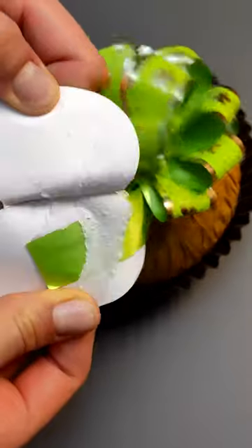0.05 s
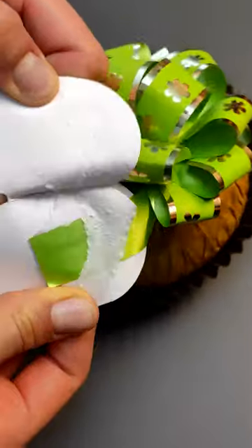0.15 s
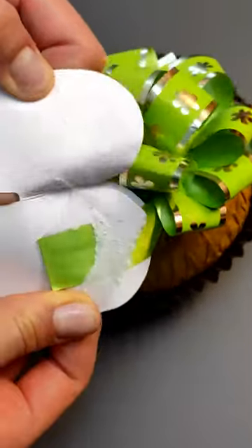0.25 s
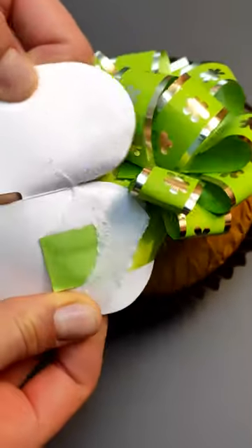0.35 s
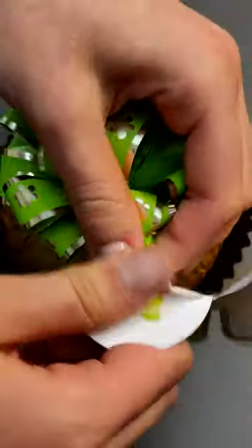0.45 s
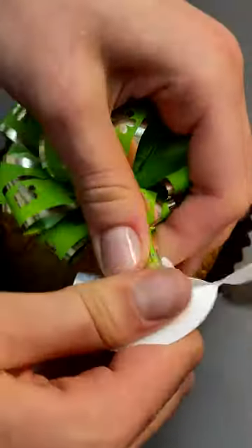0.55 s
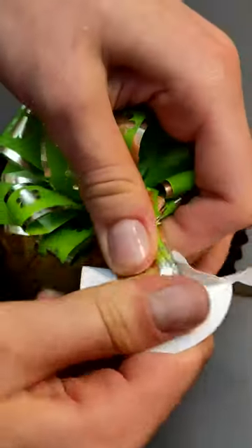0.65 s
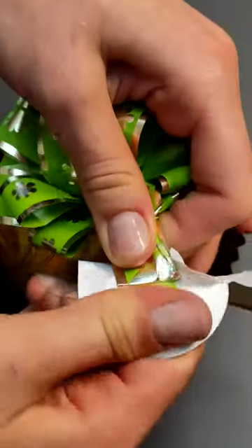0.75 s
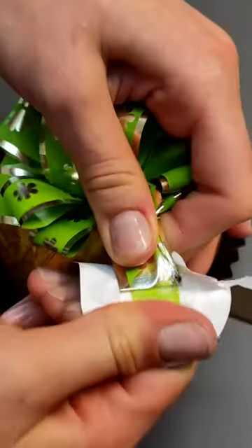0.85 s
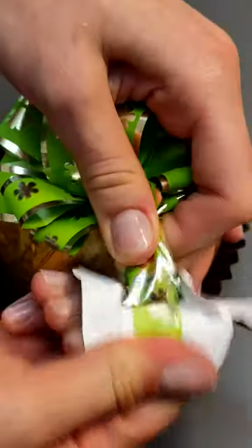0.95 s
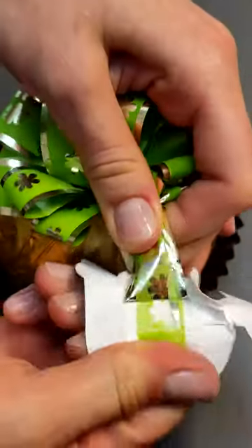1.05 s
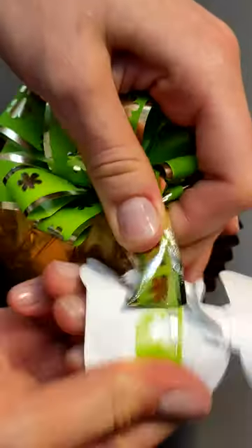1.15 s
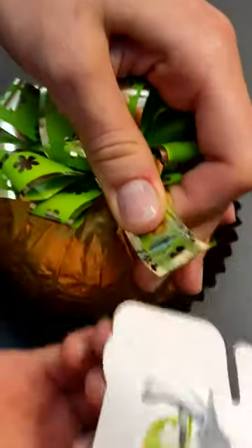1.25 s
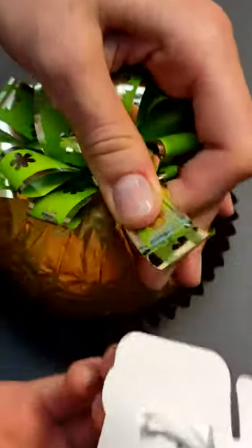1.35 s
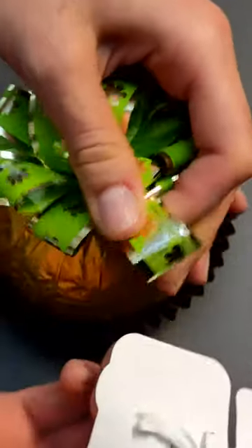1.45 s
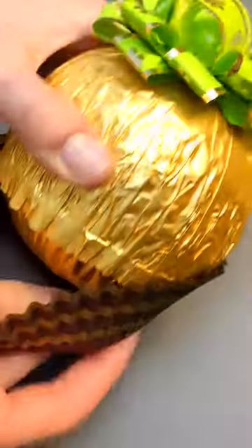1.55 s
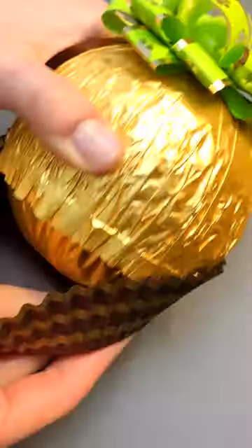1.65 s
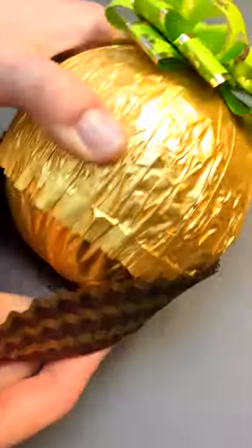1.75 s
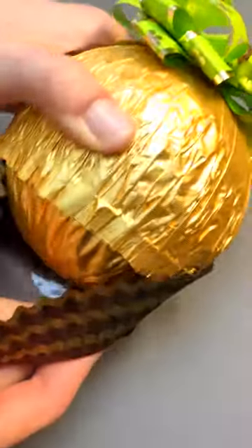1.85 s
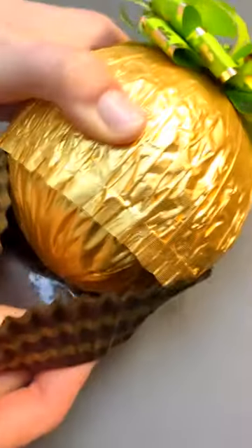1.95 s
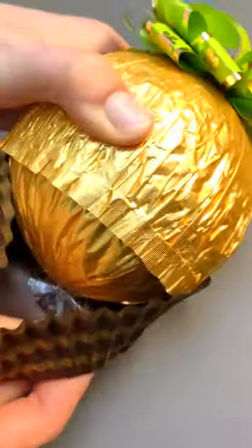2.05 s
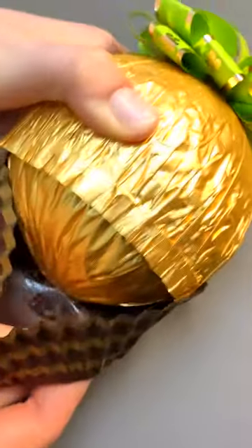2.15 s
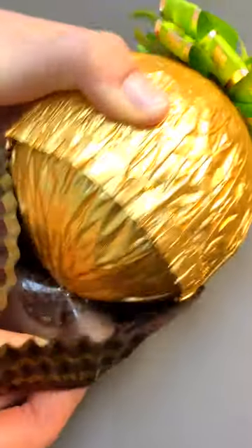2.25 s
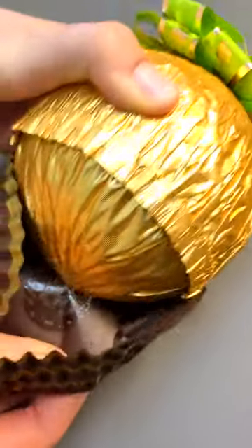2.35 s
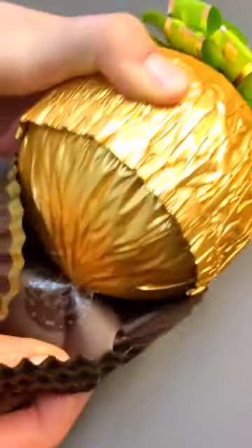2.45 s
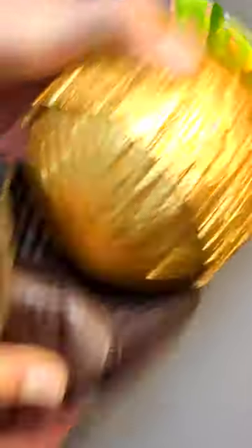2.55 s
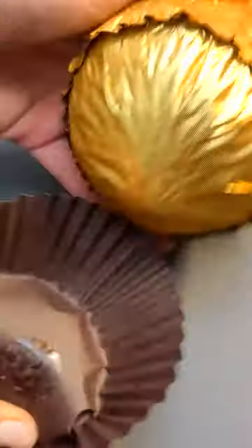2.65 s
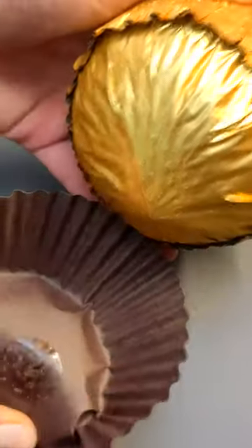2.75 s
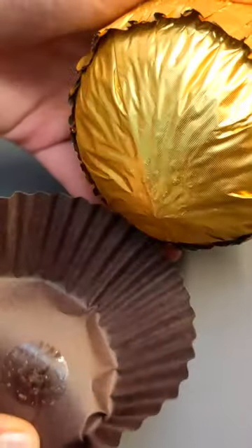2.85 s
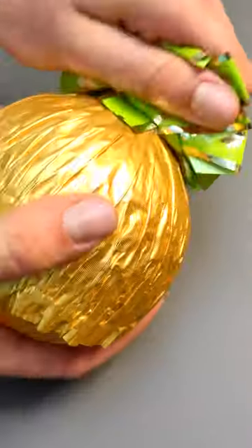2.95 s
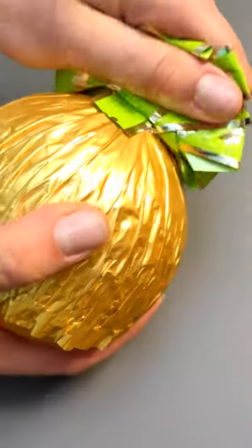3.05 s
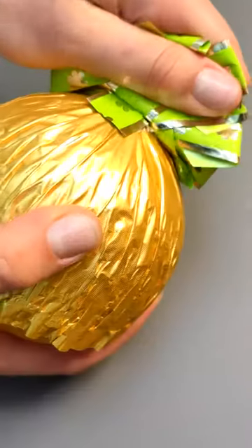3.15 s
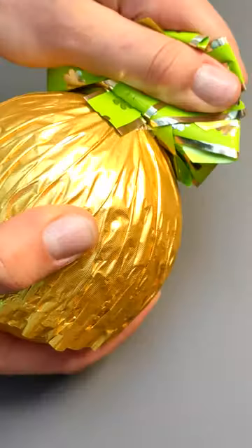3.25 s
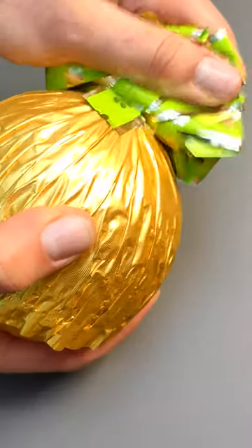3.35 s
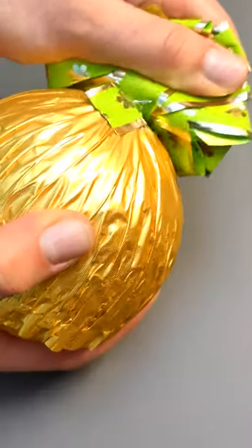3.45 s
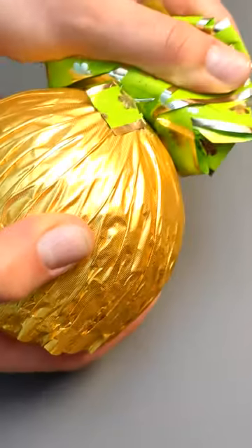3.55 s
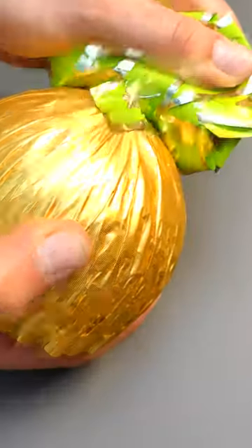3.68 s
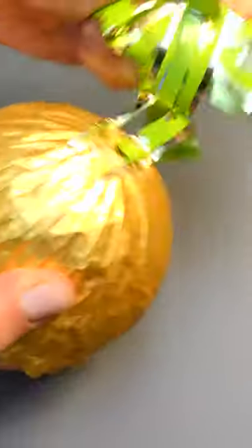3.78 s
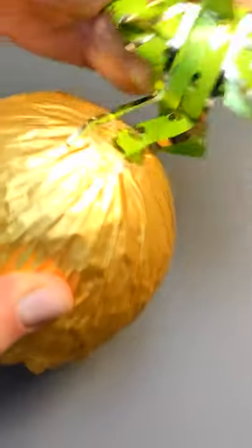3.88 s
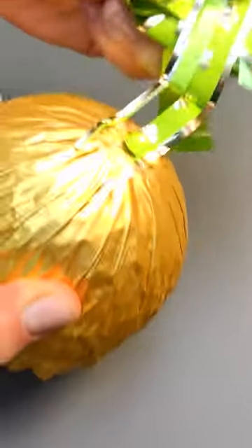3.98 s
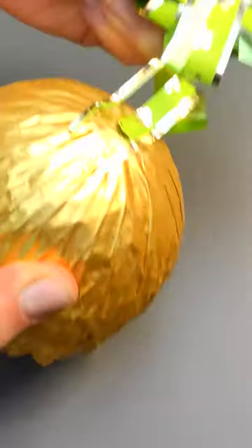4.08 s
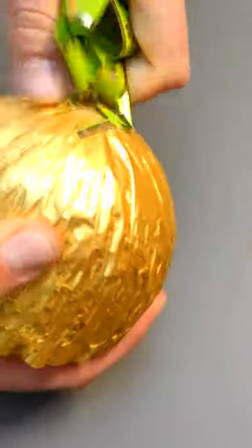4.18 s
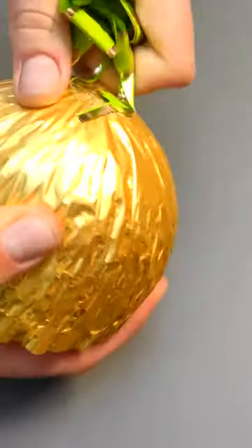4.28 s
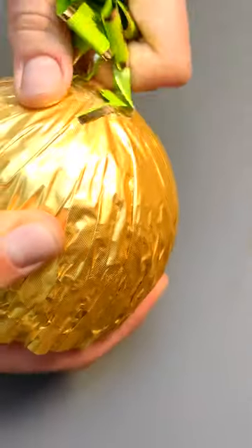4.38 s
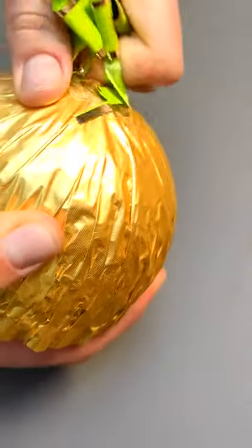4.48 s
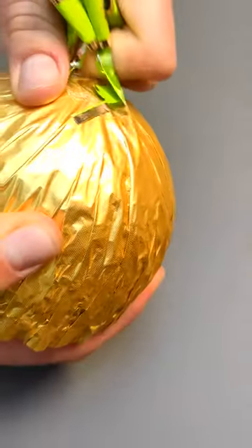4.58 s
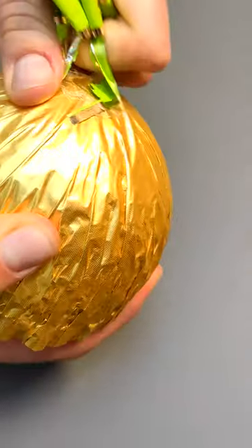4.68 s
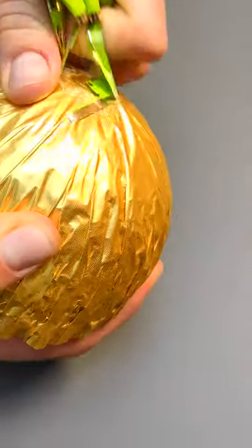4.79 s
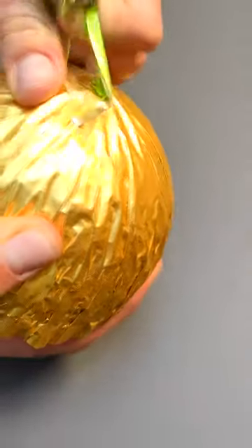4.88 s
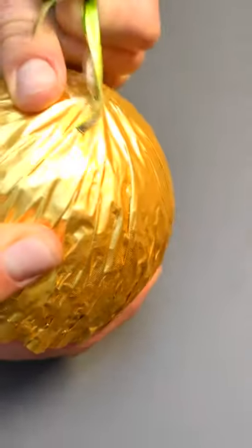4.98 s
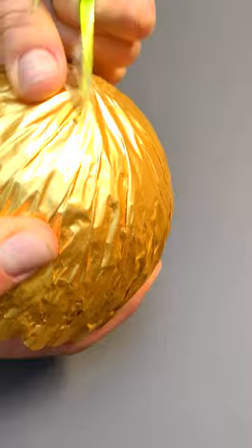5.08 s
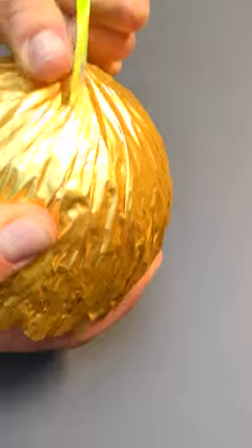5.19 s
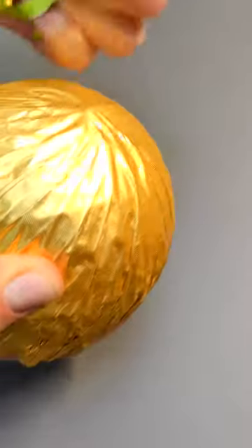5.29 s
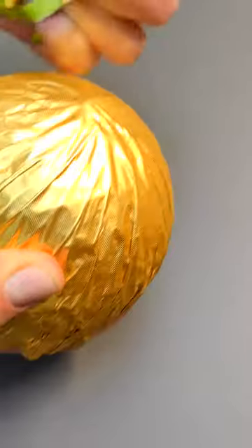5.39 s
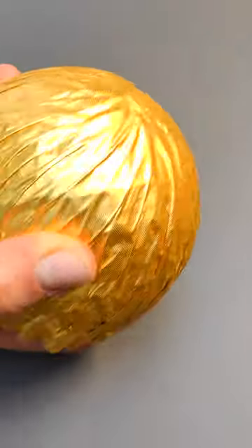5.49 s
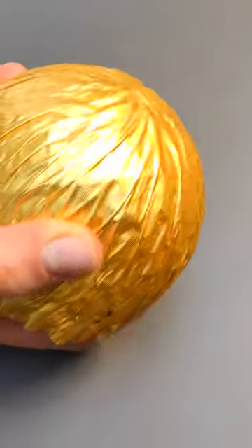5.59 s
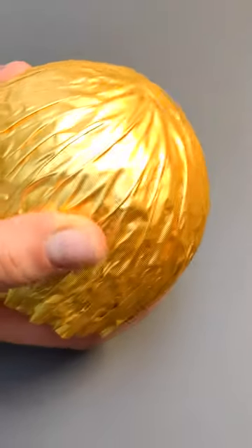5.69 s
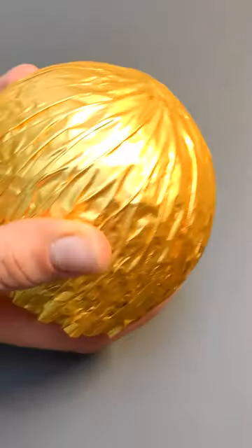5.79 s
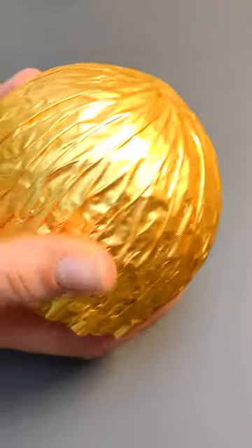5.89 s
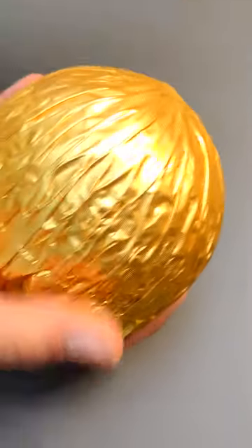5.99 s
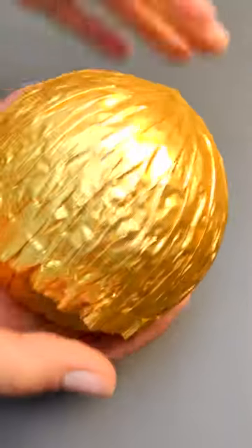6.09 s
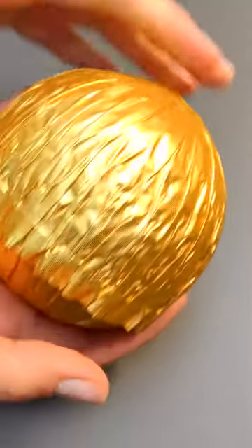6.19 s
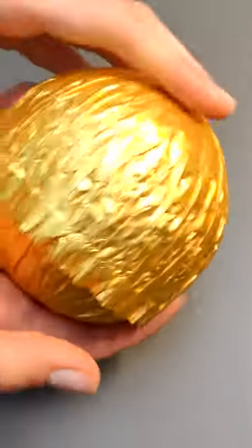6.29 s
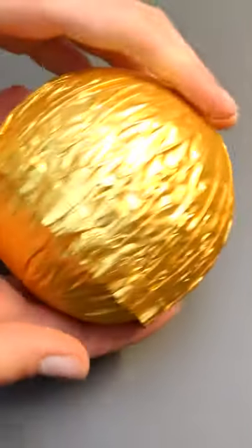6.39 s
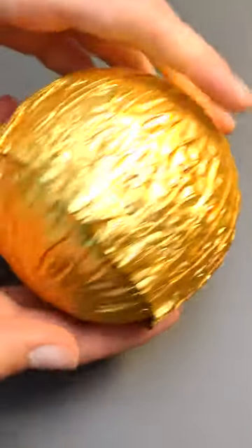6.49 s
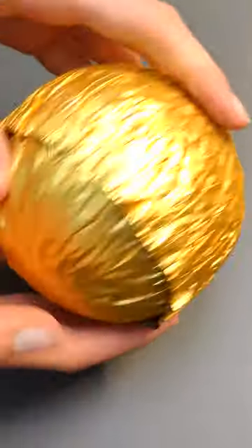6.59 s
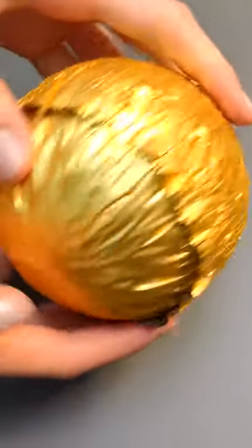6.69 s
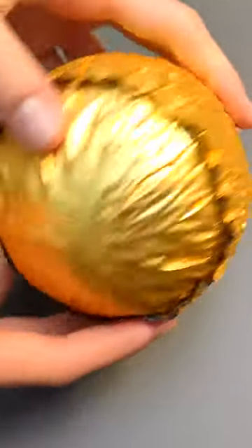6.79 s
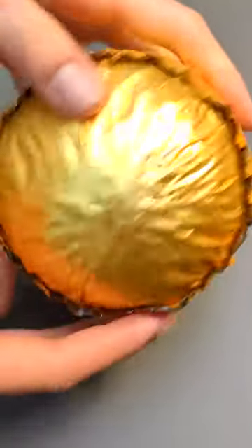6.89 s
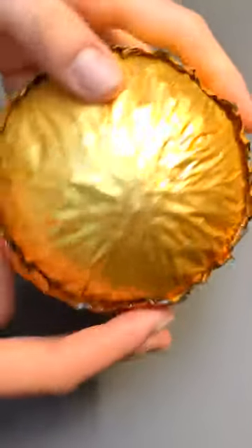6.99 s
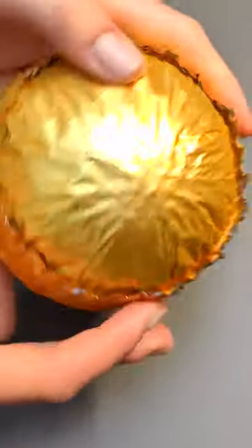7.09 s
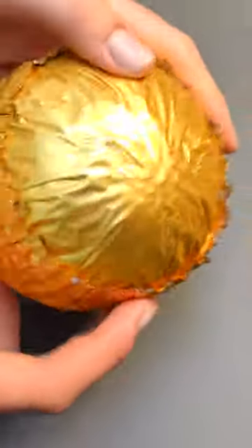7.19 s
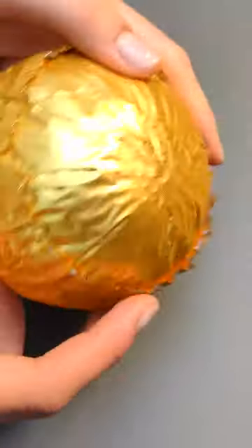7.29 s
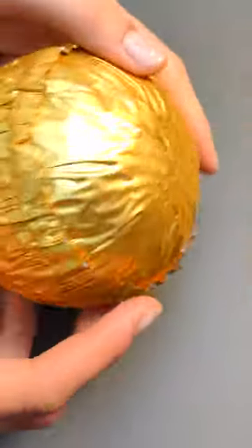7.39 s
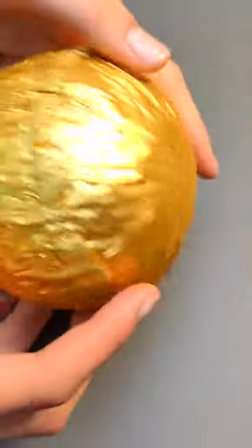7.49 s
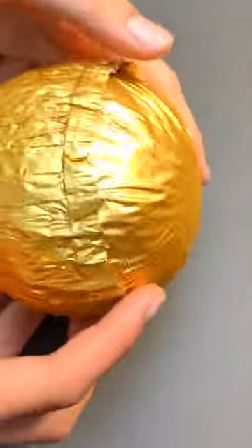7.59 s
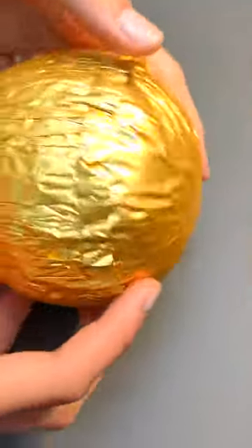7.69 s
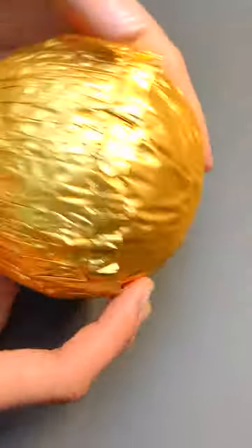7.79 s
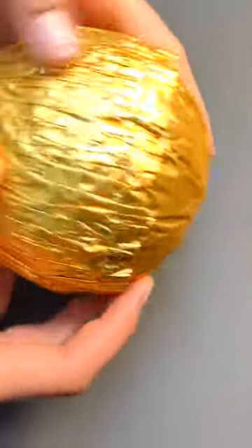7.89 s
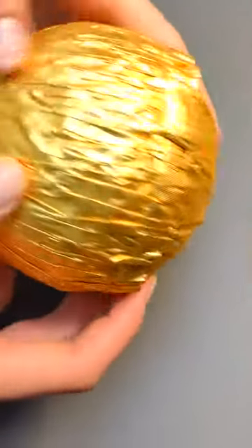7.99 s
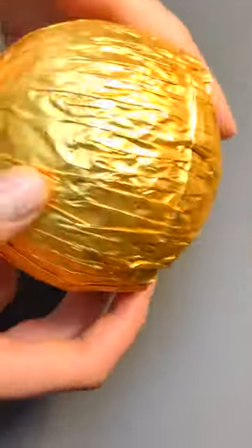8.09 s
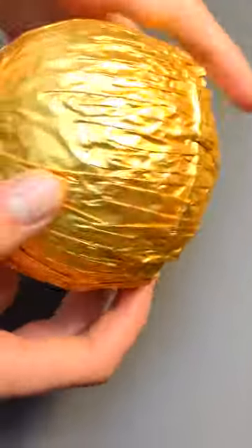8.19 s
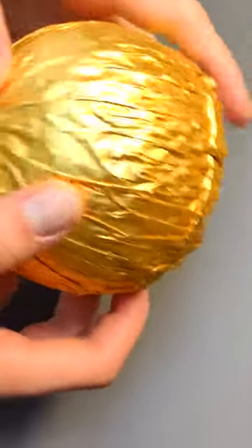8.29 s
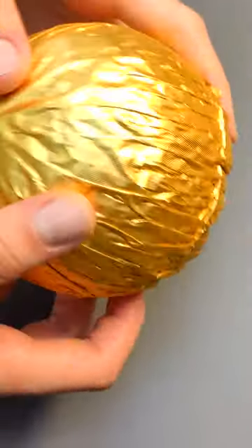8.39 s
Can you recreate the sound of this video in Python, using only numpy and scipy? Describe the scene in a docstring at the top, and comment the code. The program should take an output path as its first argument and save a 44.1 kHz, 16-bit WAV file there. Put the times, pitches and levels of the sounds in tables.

```python
"""Close up in a small room, hands unwrap a large hollow ball in thin foil, over faint air noise and an early hum.
First a paper tag is torn off, then a pleated paper cup is peeled away, a bow is pulled loose, its ribbon follows,
and the ball is turned in the fingers. Grips swell fine crackle (random ticks on ringing facets) and paper rubbing;
creases snap as noisy clicks, glue rips as click avalanches that shake the resonant shell; bumps and low thumps are
short resonant noise bursts. Scattered echoes answer from close by and from the walls."""
import sys
import numpy as np
from scipy import signal
from scipy.fft import rfft, irfft, next_fast_len
from scipy.io import wavfile
from scipy.ndimage import uniform_filter1d, minimum_filter1d

SR = 44100
rng = np.random.default_rng(int(sys.argv[2]) if len(sys.argv) > 2 else 0)


def output_pcm(signal):
    """Save a mono or channel-first signal as 16-bit PCM at the path in sys.argv[1].

    Samples are clipped to [-1, 1] before scaling.
    """
    pcm = np.clip(np.atleast_2d(signal).T, -1, 1) * 32767
    wavfile.write(sys.argv[1], SR, np.round(pcm).astype(np.int16))


N = 372204
TIME = np.arange(N) / SR


def from_db(db):
    """Decibels to amplitude gain."""
    return 10 ** (np.asarray(db) / 20)


def rms_one(x):
    """Scale to unit power."""
    return x / np.sqrt(np.mean(x ** 2) + 1e-20)


def convolve(x, response):
    """Pass a sound through an impulse response, keeping its length."""
    return signal.fftconvolve(x, response)[:len(x)]


def colour(x, spectrum, size=4096):
    """Causal (minimum-phase) filter with the given spectrum."""
    hz, db = np.transpose(spectrum)
    grid_hz = np.maximum(np.arange(size // 2 + 1) * SR / size, 1)
    level_db = np.interp(np.log(grid_hz), np.log(hz), db)
    # folding the cepstrum onto positive time makes the filter minimum-phase
    cepstrum = irfft(np.log(from_db(level_db)))
    cepstrum[1:size // 2] *= 2
    cepstrum[size // 2 + 1:] = 0
    return convolve(x, irfft(np.exp(rfft(cepstrum))))


def resonance(x, hz, width_hz):
    """Two-pole resonance with a gain of about 1 at its peak."""
    radius = np.exp(-np.pi * width_hz / SR)
    zeros = np.array([1, 0, -1]) * (1 - radius ** 2) / 2
    poles = [1, -2 * radius * np.cos(2 * np.pi * hz / SR), radius ** 2]
    return signal.lfilter(zeros, poles, x + 1e-18)


def drift(knots_per_s):
    """Slow random wander with an RMS of 1."""
    knots = rng.standard_normal(int(knots_per_s * N / SR) + 2)
    return rms_one(np.interp(TIME * knots_per_s, np.arange(len(knots)), knots))


def grains(per_s, spread_db, size=N):
    """Random clicks: many small ones, a few large."""
    sizes = from_db(spread_db * np.minimum(rng.exponential(1, size), 3.4))
    signs = rng.choice([-1, 1], size)
    return sizes * signs * (rng.random(size) < per_s / SR)


def add(track, s, sound):
    """Mix a sound into a track at a time in seconds."""
    start = max(int(s * SR), 0)
    track[start:start + len(sound)] += sound[:N - start]


# spectrum of the steady air noise: pitch_hz [Hz], level_db [dB, relative]
AIR_COLOUR = [(30, 2.5), (120, -17), (260, 6.5), (600, 2.5), (1500, -1), (4000, -7.5), (6000, 2),
              (9000, -30), (15500, -11)]


def air(level_db=-60.5):
    """Steady coloured noise lies under everything."""
    return from_db(level_db) * rms_one(colour(rng.standard_normal(N), AIR_COLOUR))


def low_hum(hum_hz=127, width_hz=30, hum_db=-67, swells_per_s=7.3, until_s=1.5):
    """Narrow low noise wavers faintly under the first moments, fading over the last half second."""
    hum = resonance(rng.standard_normal(N), hum_hz, width_hz)
    hum = resonance(hum, hum_hz, width_hz * 2)
    swell = from_db(2 * drift(swells_per_s))
    fade = np.clip((until_s - TIME) * 2, 0, 1)
    return from_db(hum_db) * swell * rms_one(hum) * fade


# The fingers take hold and squeeze: the tag from 0 s, the cup from 1.57 s, the bow from 2.95 s,
# the ribbon from 4.177 s, turning the ball from 5.58 s:
# start_s [s], length_s [s], foil_db [dB, crackle], paper_db [dB, rubbing]
GRIPS_ON_WRAPPING = [(0.0, .15, -35, -42), (0.21, 0.12, -36, -47), (0.38, 0.13, -52, -52),
                     (0.504, 0.1, -44, -49), (0.629, 0.1, -35.5, -43), (0.79, 0.36, -40.5, -48),
                     (1.14, 0.081, -36, -60), (1.411, 0.25, -40, -45.5), (1.57, 0.06, -35, -29),
                     (1.701, .13, -35, -32), (1.83, 0.19, -32.5, -30.5), (2.044, 0.44, -37.5, -34.5),
                     (2.315, 0.29, -35.5, -33), (2.666, 0.035, -17, -19.5), (2.95, 0.04, -23, -33),
                     (3.071, 0.31, -32, -47.5), (3.46, 0.099, -33.5, -44.5), (3.62, 0.13, -41.5, -56.5),
                     (3.93, 0.38, -50, -51.5), (4.177, 0.28, -29, -39), (4.454, 0.45, -35, -46),
                     (5.123, 0.11, -33, -47.5), (5.4, 0.087, -39.5, -49), (5.504, 0.03, -37, -49),
                     (5.58, 0.35, -52.5, -67), (6.124, 0.54, -51.5, -62.5), (6.539, .14, -43.5, -48),
                     (6.706, 0.11, -46, -60), (6.86, 0.13, -45.5, -56.5), (7.092, 0.47, -46, -58),
                     (7.187, 0.11, -42, -54.5), (7.569, 0.094, -32, -46), (7.698, 0.1, -41, -53.5),
                     (7.858, 0.29, -50, -62), (7.996, 0.087, -38.5, -54.5), (8.156, 0.037, -35.5, -53),
                     (8.29, 0.1, -50, -73)]
# a grip closes quickly, eases off while it lasts and lets go
GRIP_ATTACK_S, GRIP_SAG_DB_PER_S, GRIP_RELEASE_DB_PER_S = 0.013, 6.5, 206
# crackle and rubbing build towards each rip and settle after it; the longer the rip, the more it stirs
STRAIN_DB_PER_S, SETTLE_DB_PER_S = 435, 199
STIR_FOIL_DB, STIR_PAPER_DB, STIR_LENGTH_S = -14, -10.5, 0.025


def effort():
    """Hand force as gains of foil crackle and paper rubbing: the grips, plus the strain around every rip."""
    power = np.zeros((2, N))
    for start_s, length_s, foil_db, paper_db in GRIPS_ON_WRAPPING:
        t = TIME - start_s
        sag_db = -GRIP_SAG_DB_PER_S * np.clip(t, 0, length_s)
        release_db = -GRIP_RELEASE_DB_PER_S * np.clip(t - length_s, 0, 1)
        grip = np.clip(t / GRIP_ATTACK_S, 0, 1) * from_db(sag_db + release_db)
        power += np.outer(from_db([foil_db, paper_db]), grip) ** 2
    for start_s, length_s, crack_db, shell_db in GLUE_RIPS:
        build_db = -STRAIN_DB_PER_S * np.clip(start_s - TIME, 0, 1)
        settle_db = -SETTLE_DB_PER_S * np.clip(TIME - start_s - length_s, 0, 1)
        stir = from_db([crack_db + STIR_FOIL_DB, shell_db + STIR_PAPER_DB])
        power += length_s / STIR_LENGTH_S * np.outer(stir, from_db(build_db + settle_db)) ** 2
    return np.sqrt(power)


# bright spectrum of thin foil: pitch_hz [Hz], level_db [dB, relative]
FOIL_COLOUR = [(60, -30.5), (400, -20), (1300, -20), (2600, -6.5), (4300, -0.5), (5800, 4.5), (7200, 1),
               (8700, -8), (11500, -8), (15500, -17.5)]
# spectrum of skin sliding on foil: pitch_hz [Hz], level_db [dB, relative]
HISS_COLOUR = [(60, -21), (400, -23), (1500, -18.5), (3000, -5), (4500, -0.5), (6000, 8), (8700, -4.5),
               (11500, -8), (15500, -11.5)]
# how much the fingers slide rather than press: time_s [s], level_db [dB, hiss against ticks]
FINGER_SLIDING = [(0.0, 0), (2.9, -4), (3.0, -8), (5.4, -2), (7.9, -4.5), (8.1, 13)]


def crackle(per_s=260, spread_db=5.0, facet_width_hz=1500, broad=0.3, even_s=0.025, count=12):
    """Small wrinkles tick, each on a facet of its own pitch, over the fine hiss of skin sliding on foil."""
    clicks = grains(per_s * from_db(4.6 * drift(30)), spread_db)
    facet = rng.integers(0, count, N)
    rings = np.zeros(N)
    for k, hz in enumerate(np.geomspace(2400, 10000, count)):
        rings += resonance(clicks * (facet == k), hz, facet_width_hz)
    ticks = colour(rings + broad * clicks, FOIL_COLOUR)
    # a steady push releases about the same energy in every short stretch
    local_power = np.abs(uniform_filter1d(ticks ** 2, int(even_s * SR)))
    ticks /= np.sqrt(local_power + 0.023 * np.mean(ticks ** 2))
    hiss = rms_one(colour(grains(6000, 1.5), HISS_COLOUR))
    sliding = from_db(np.interp(TIME, *np.transpose(FINGER_SLIDING)))
    return (ticks + sliding * hiss) / np.hypot(1, sliding)


# modes of the hollow ball: pitch_hz [Hz], width_hz [Hz], level_db [dB against the sound that shakes it]
SHELL_MODES = [(280, 45, -6), (470, 42, -6), (639, 34, -7), (1200, 46, -4.5), (1640, 180, -25)]


def shell(x, tuning=1):
    """The hollow ball rings along with what shakes it."""
    ringing = sum(from_db(db) * resonance(x, hz * tuning, width_hz) for hz, width_hz, db in SHELL_MODES)
    return x + ringing


# spectrum of paper and fingers scraping: pitch_hz [Hz], level_db [dB, relative]
PAPER_COLOUR = [(30, -33), (170, -22.5), (290, -13), (420, -9), (650, -4), (900, -2.5), (1250, -1),
                (2100, 0.5), (3200, -2), (6000, -33.5)]


def rubbing(per_s=3000, spread_db=4.5, uneven_db=2.06, wander=0.045):
    """Paper and fingers scrape over the ridges of the ball; its pitch wanders as the hold shifts."""
    slips = grains(per_s, spread_db) * from_db(uneven_db * drift(70))
    scrape = shell(colour(slips, PAPER_COLOUR))
    # reading at a varying speed bends the pitch
    position = np.cumsum(1 + wander * drift(10)) % N
    return rms_one(np.interp(position, np.arange(N), scrape))


# tag, ribbon and foil ring while pulled taut:
# start_s [s], end_s [s], pitch_hz [Hz], width_hz [Hz], level_db [dB against the handling sound]
TAUT_SHEETS = [(0.0, 1.07, 13000, 4930, -2), (0.03, 1.532, 2850, 480, 3), (2.95, 3.426, 10900, 3960, -2.5),
               (4.16, 4.363, 2030, 696, 5.5), (5.603, 5.742, 3070, 453, 6)]


def taut(x):
    """A stretched sheet picks up the handling sounds and rings with them."""
    ringing = np.zeros(N)
    for start_s, end_s, pitch_hz, width_hz, level_db in TAUT_SHEETS:
        pulled = x * ((TIME > start_s) & (TIME < end_s))
        ringing += from_db(level_db) * resonance(pulled, pitch_hz, width_hz)
    return ringing


# single creases snapping: start_s [s], crack_db [dB, before trim], body_db [dB, dull tug before trim]
CREASE_SNAPS = [(0.0845, -4, -22), (0.2872, -5.5, -38), (0.3029, -7, -27), (0.3173, -13, -42),
                (0.3445, -17.5, -33), (0.411, -9.5, -27), (0.507, -17, -34), (0.5249, -15, -33),
                (0.673, -12.5, -31), (0.9409, -7.5, -35), (0.9829, -6.5, -46), (1.067, 1.5, -35),
                (1.1357, -0.5, -33), (1.1554, 2, -51), (1.2157, 2, -21), (1.2577, 0.5, -28),
                (1.5022, -6.5, -36), (1.5654, -10, -25.5), (1.5976, -1.5, -22), (1.843, 0.5, -10.5),
                (1.8656, -6.5, -36), (1.8805, -2, -40), (1.92, 0, -36), (1.955, -5.5, -32.5),
                (1.9783, -2.5, -41), (2.0732, 6, -25), (2.0897, 3.5, -22), (2.107, -13, -31),
                (2.161, -8.5, -23.5), (2.2182, 2.5, -25), (2.2827, -8.5, -37), (2.3026, -6.5, -32),
                (2.3124, 2, -28), (2.385, -13, -16), (2.402, -7.5, -25), (2.5353, 1, -25.5),
                (2.5474, -3, -31), (2.7945, 3, -15), (2.8686, -16, -27.5), (2.9597, -7, -28),
                (2.9813, 0, -33), (3.005, -3, -39), (3.0136, -10.5, -46), (3.0996, -4, -20),
                (3.1365, 0, -27), (3.1714, -6.5, -35), (3.1911, -9, -47), (3.2169, -7.5, -40),
                (3.261, -8, -34), (3.2823, -4, -35), (3.287, -1, -31), (3.3281, -4, -45),
                (3.3757, -14, -48), (3.3952, -8, -48), (3.4406, -16, -52), (3.475, -9, -34),
                (3.5535, -16, -44), (3.619, -15, -54), (3.6391, -9, -33), (3.7767, -2, -23),
                (3.9521, -23, -40), (4.0612, -5, -47), (4.2374, -4, -28), (4.255, -16, -25),
                (4.2597, -11.5, -36), (4.2727, 2, -22.5), (4.3144, -4.5, -28), (4.4633, -11, -27.5),
                (4.5017, -1.5, -37), (4.572, 2, -21.5), (4.6102, 2, -22), (4.6628, -11, -31),
                (4.6934, -8, -38), (4.7, -4, -32), (4.719, -11, -30), (4.7557, 0.5, -21.5),
                (4.8063, -8.5, -38), (4.8258, -15, -49), (4.856, -17, -27), (4.8738, -11.5, -41),
                (4.903, -4.5, -43), (4.92, -8.5, -46), (4.9328, -2.5, -29.5), (4.971, 2.5, -23),
                (5.0381, -8, -24.5), (5.0828, -13, -38), (5.139, -10, -34), (5.1669, -10.5, -40),
                (5.1876, -7.5, -56), (5.259, -6.5, -28.5), (5.432, -18.5, -32), (5.7488, -13, -61.5),
                (5.7803, -29, -43.5), (5.8542, -21.5, -46), (5.9284, -27.5, -64), (5.9582, -26, -59),
                (6.116, -27.5, -50), (6.136, -24, -44), (6.1744, -27.5, -60), (6.2093, -25, -65),
                (6.2341, -20, -48), (6.552, -12, -50), (6.5758, -15, -40), (6.726, -24, -52),
                (6.7744, -11.5, -33), (6.8369, -25, -53), (7.015, -20.5, -40), (7.0813, -22, -49),
                (7.129, -26, -47), (7.2017, -11, -34), (7.2202, -19, -46), (7.2384, -15, -35),
                (7.3362, -17, -49), (7.4038, -25.5, -42), (7.713, -11.5, -47), (7.9014, -21, -52),
                (8.0202, -5.5, -37), (8.3325, -28, -60)]
# dull spectrum of a tug at the shell: pitch_hz [Hz], level_db [dB, relative]
BODY_COLOUR = [(30, -49.5), (170, -19.5), (290, -4), (600, 1), (900, 0), (1900, 4), (3000, 6), (6000, -38)]
CLICK_DELAY_S = .001   # each click sounds this long after its listed time


def snaps(facet_hz=4400, octaves_per_db=0.07, facet_width_hz=1200, overtone=1.31,
          buckle_s=0.00088, buckle_spread=0.62, rough=0.55, after_s=0.006, after_db=-9,
          body_s=0.0011, crack_trim_db=-11.5, body_trim_db=-1.0, size=2048, count=160):
    """A crease flips with a sharp click, a short stutter and a weaker second click, and tugs at the shell.
    Its facet rings in two modes: the smaller the facet, the lighter the tug and the higher the pitch."""
    out, t = np.zeros(N), TIME[:size]
    click = t == 0
    for start_s, crack_db, body_db in CREASE_SNAPS:
        stutter, tug = rng.standard_normal((2, size))
        slowness, lateness, shape, hold = rng.uniform(-1, 1, 4)
        decay_s = buckle_s * np.exp(buckle_spread * slowness)
        flip = click + rough * stutter * np.exp(-t / decay_s)
        second_delay_s = after_s * (1 + lateness / 2)
        flip += from_db(after_db) * np.roll(flip, int(second_delay_s * SR))
        hz = facet_hz * 2 ** (octaves_per_db * (crack_db - body_db) + shape / 10)
        facet = resonance(flip, hz, facet_width_hz)
        facet += .5 * resonance(flip, overtone * hz, facet_width_hz)
        bright = colour(flip + facet, FOIL_COLOUR)
        pull = click + rough * tug * np.exp(-t / body_s)
        dull = shell(colour(pull, BODY_COLOUR), 1 + hold / 20)
        # levels hold for the first few milliseconds
        add(out, start_s + CLICK_DELAY_S, from_db(crack_db + crack_trim_db) * bright / np.std(bright[:count]))
        add(out, start_s + CLICK_DELAY_S, from_db(body_db + body_trim_db) * dull / np.std(dull[:count]))
    return out


# rips, where many creases or glue threads give way at once:
# start_s [s], length_s [s], crack_db [dB, before trim], shell_db [dB, before trim]
GLUE_RIPS = [(0.086, 0.025, -20, -32), (1.001, 0.058, -14.5, -47), (1.028, 0.0058, -8, -28),
             (1.238, 0.0077, -7, -25.5), (1.247, 0.027, -19.5, -27), (2.348, 0.0067, -11.5, -17),
             (2.651, 0.013, -5, -12.5), (2.7, .011, -12.5, -12), (3.464, 0.0046, -4.5, -22),
             (3.801, 0.025, -2, -15.5), (4.3613, 0.0046, -5, -22), (4.405, 0.003, -9, -23),
             (4.984, .011, -8, -23), (5.301, 0.0052, -13.5, -33.5), (5.318, 0.014, -3.5, -17),
             (8.264, 0.0044, -20.5, -66)]


def rips(per_s=7000, spread_db=2.5, release_s=0.0051, crack_trim_db=-2.5, shell_trim_db=-2.0, size=8192):
    """An avalanche of tiny breaks starts at once, runs its length and dies."""
    out, t = np.zeros(N), TIME[:size]
    for start_s, length_s, crack_db, shell_db in GLUE_RIPS:
        strain = np.exp(-np.maximum(t - length_s, 0) / release_s)
        held = max(int(length_s * SR), 20)
        bright = colour(strain * grains(per_s, spread_db, size), FOIL_COLOUR)
        dull = shell(colour(strain * grains(per_s, spread_db, size), BODY_COLOUR))
        add(out, start_s, from_db(crack_db + crack_trim_db) * bright / np.std(bright[:held]))
        add(out, start_s, from_db(shell_db + shell_trim_db) * dull / np.std(dull[:held]))
    return out


# bumps on the hollow ball, and low thumps under the two loudest rips (90 Hz at 3.812 s, 70 Hz at 5.326 s):
# start_s [s], level_db [dB peak, before trim], pitch_hz [Hz]
BUMPS_AND_THUMPS = [(0.428, -34, 470), (0.709, -32, 570), (2.196, -36, 195), (3.812, -23, 90),
                    (5.17, -36.5, 616), (5.324, -19, 275), (5.326, -29, 70), (6.727, -38.5, 674),
                    (7.589, -35, 398), (8.217, -40, 530)]


def bumps_and_thumps(swell_s=0.00502, width_hz=230, skirt_hz=380, trim_db=-2.5, size=6000):
    """A soft, scuffing burst of noise passes two broad resonances at one low pitch and dies quickly."""
    out, t = np.zeros(N), TIME[:size]
    for start_s, level_db, pitch_hz in BUMPS_AND_THUMPS:
        scuff = rng.standard_normal(size) * t * np.exp(-t / swell_s)
        ring = resonance(scuff, pitch_hz, width_hz)
        ring = resonance(ring, pitch_hz, skirt_hz)
        add(out, start_s - swell_s, from_db(level_db + trim_db) * ring / np.abs(ring).max())
    return out


def room(x, near_t60_s=0.032, near_db=-9.0, far_t60_s=0.21, far_db=-14.0, build_s=0.0066, size=22050):
    """Scatter from nearby things dies quickly, the walls answer a little longer."""
    t = TIME[:size]
    near, far = rng.standard_normal((2, size))
    near = rms_one(near * from_db(-60 * t / near_t60_s) * (t > .0012))
    far = rms_one(far * from_db(-60 * t / far_t60_s) * (1 - np.exp(-t / build_s)))
    response = from_db(near_db) * near + from_db(far_db) * far
    return convolve(x, response / np.sqrt(size))


def moving_room(x, knots_per_s=7, swing_rad=1.48):
    """The hands keep moving, so the pattern of scatter keeps changing."""
    angle = swing_rad * drift(knots_per_s)
    return np.cos(angle) * room(x) + np.sin(angle) * room(x)


def delayed(x, s):
    """Delay by any fraction of a sample, as a phase slope."""
    size = next_fast_len(N + SR // 10)
    hz = np.arange(size // 2 + 1) * SR / size
    return irfft(rfft(x, size) * np.exp(-2j * np.pi * hz * s), size)[:N]


# echoes from hands and table top: delay_s [s], level_db [dB against the direct sound]
NEAR_ECHOES = [(.0043, -22.5), (.0052, -33.5)]


def echoes(x):
    """Hands and table top return single weak copies."""
    return sum(from_db(level_db) * delayed(x, delay_s) for delay_s, level_db in NEAR_ECHOES)


def ports(mid, scattered, lag_s=1.0e-5, side_hz=3300, scattered_db=-7.0, wander=1.0):
    """Two close microphone ports differ mainly in the treble: a tiny lag, wandering in strength, and scatter."""
    side = (mid - delayed(mid, lag_s)) / 2 * (1 + wander * drift(40))
    side += from_db(scattered_db) * np.gradient(scattered)
    highpass = signal.butter(2, min(side_hz, SR / 3), "high", fs=SR, output="sos")
    side = signal.sosfiltfilt(highpass, side)
    centre = delayed(mid, lag_s / 2)
    return np.array([centre + side, centre - side])


def scene(crackle_db=1.5, rubbing_db=0.0):
    """All handling sounds in the room, over air noise and the early hum."""
    foil, paper = effort()
    direct = snaps() + rips()
    direct += from_db(crackle_db) * foil * crackle()
    direct += from_db(rubbing_db) * paper * rubbing()
    direct += taut(direct) + bumps_and_thumps()
    mid = direct + moving_room(direct) + echoes(direct)
    mid += air() + low_hum()
    return ports(mid, room(direct))


# the level dips briefly: start_s [s], length_s [s], level_db [dB, before the edges are smoothed]
LEVEL_DIPS = [(2.948, 0.0081, -31), (5.485, 0.032, -11)]


def record(dry, size=44, ceiling=.94, cutoff_hz=16000, offset=.0015):
    """The level dips briefly twice, a fast limiter holds both channels, the top is cut; a DC offset is added."""
    dip_db = np.zeros(N)
    for start_s, length_s, level_db in LEVEL_DIPS:
        dip_db += level_db * ((TIME > start_s) & (TIME < start_s + length_s))
    x = dry * from_db(uniform_filter1d(dip_db, size))
    peak = np.abs(x).max(axis=0)
    gain = (1 + (peak / ceiling) ** 6) ** (-1 / 6)
    # the gain follows the peaks within a fraction of a millisecond
    gain = uniform_filter1d(minimum_filter1d(gain, size // 4), size // 4)
    lowpass = signal.ellip(10, .1, 80, cutoff_hz, fs=SR, output="sos")
    return signal.sosfilt(lowpass, gain * x) + offset


dry = scene()
out = record(dry)
output_pcm(out)
```